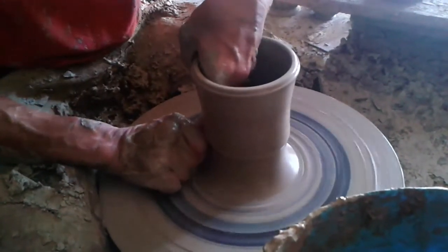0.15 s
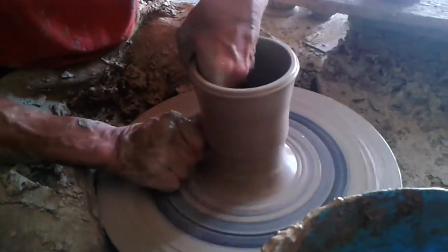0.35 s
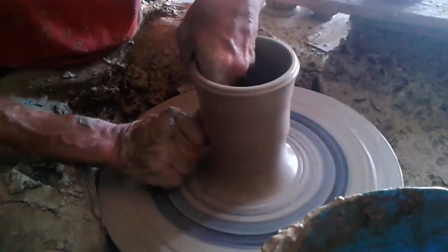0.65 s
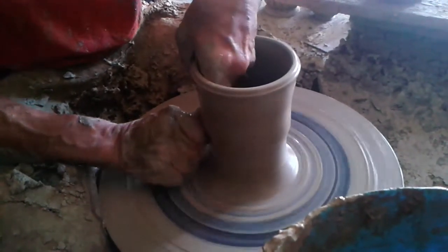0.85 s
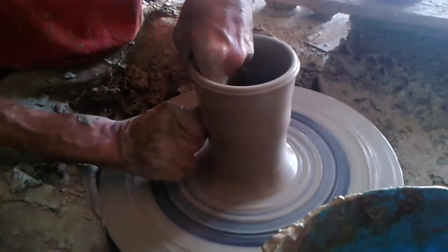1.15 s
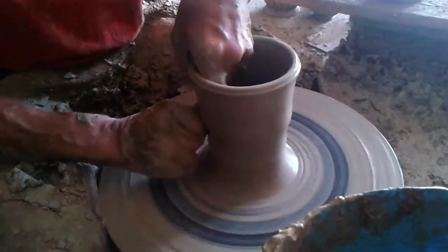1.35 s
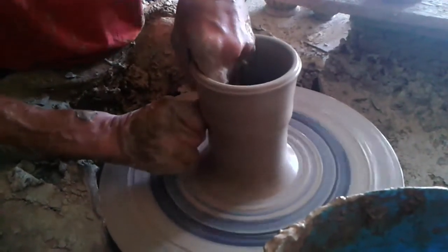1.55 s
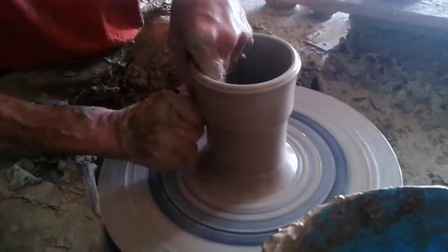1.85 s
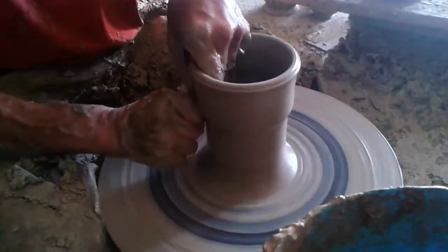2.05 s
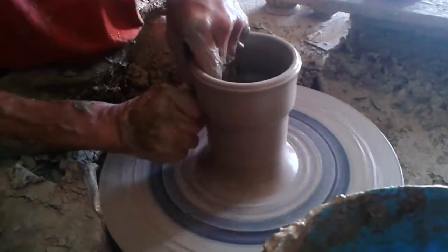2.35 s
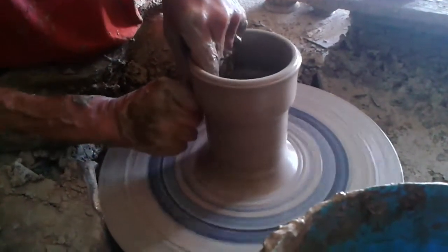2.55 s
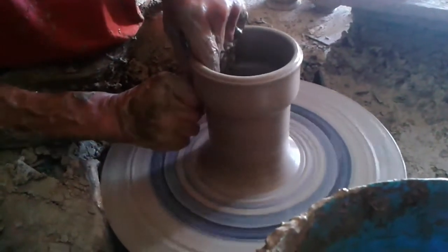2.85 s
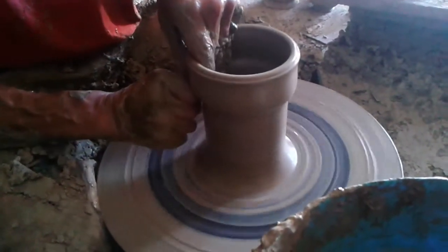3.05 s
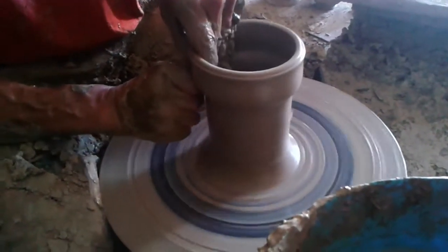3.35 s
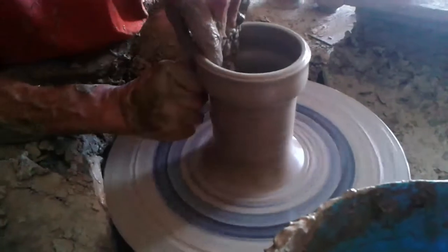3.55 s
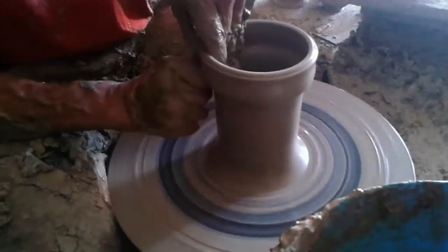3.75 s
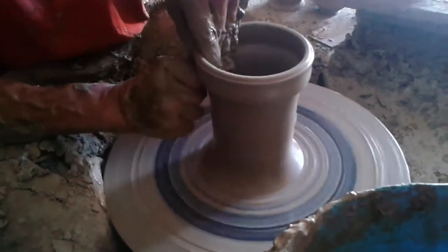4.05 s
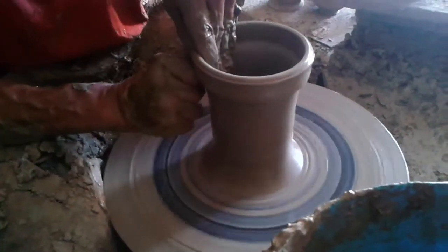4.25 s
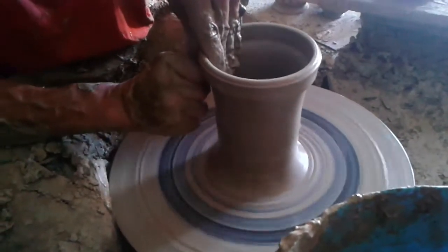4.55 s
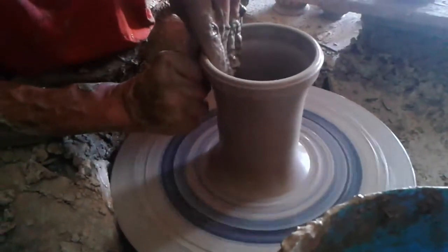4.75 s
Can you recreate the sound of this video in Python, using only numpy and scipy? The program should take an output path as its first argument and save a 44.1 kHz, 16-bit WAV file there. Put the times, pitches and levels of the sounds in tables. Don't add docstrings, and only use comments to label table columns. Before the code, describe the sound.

Close, continuous whirr of an electric pottery wheel: a nasal singing whine, low hum and soft muffled rumbling, with barely any treble.

```python
import sys
import numpy as np
from scipy import signal
from scipy.fft import rfft, irfft, next_fast_len
from scipy.io import wavfile

SR = 44100
rng = np.random.default_rng(int(sys.argv[2]) if len(sys.argv) > 2 else 0)


def inscribe(sig):
    pcm = np.round(np.clip(np.atleast_2d(sig).T, -1, 1) * 32767)
    wavfile.write(sys.argv[1], SR, pcm.astype(np.int16))


def ratio(d):
    e = np.asarray(d, float) / 20
    return 10 ** e


N = 216290
TIME = np.arange(N) / SR


def in_time(rows):
    s, *columns = np.transpose(rows)
    return [np.interp(TIME, s, column) for column in columns]


def drift(rate_hz):
    coarse, settle = 40, 2000
    pole = np.exp(-2 * np.pi * rate_hz * coarse / SR)
    noise = rng.standard_normal(N // coarse + settle + 2)
    slow = signal.lfilter([1], [1, -2 * pole, pole * pole], noise)[settle:]
    return np.interp(np.arange(N) / coarse, np.arange(len(slow)), slow / slow.std())


def tone(turns, level_db, unsteady_db):
    level = np.sqrt(2) * ratio(level_db + unsteady_db * drift(1.5))
    return level * np.sin(2 * np.pi * (turns + rng.random()))


# (t/s, f/Hz)
WHINE_PITCH = [
    (0.2, 637.4),
    (3.47, 635.8),
    (4.7, 637.4),
]
# (t/s, level/dB rms)
WHINE = [
    (0, -36),
    (.4, -33.5),
    (1.7, -32),
    (2.4, -33.5),
    (3.7, -35),
    (4.9, -33.5),
]
# (multiple of shaft speed, level/dB rms, unsteadiness/dB)
SHAFT_ORDERS = [(1, -70.5, -0.9), (4, -58.5, 1.5), (6, -43, -1.5), (11, -39.5, -1.5), (21, -51, 2),
                (22, -45.5, 0), (25, -41, 2), (27, -44.5, 2.0), (28, -53, 2.5), (30, -48, -0.5),
                (45, -63, 7), (46, -52.5, 1.5), (47, -54.5, 1.5), (94.8, -67.5, 3)]
# (f/Hz, level/dB rms, unsteadiness/dB)
MAINS_HUM = [(300.6, -32.5, -1)]


def motor():
    slots, mains_hz = 28, 50
    whine_hz, = in_time(WHINE_PITCH)
    whine_db, = in_time(WHINE)
    shaft_turns = np.cumsum((whine_hz + mains_hz) / slots) / SR
    out = tone(slots * shaft_turns - mains_hz * TIME, whine_db, .8)
    for multiple, level_db, unsteady_db in SHAFT_ORDERS:
        out += tone(round(multiple) * shaft_turns, level_db, unsteady_db)
    for hz, level_db, unsteady_db in MAINS_HUM:
        out += tone(hz * TIME, level_db, unsteady_db)
    return out


# (t/s, level/dB)
SHAKE = [(0, -21), (.5, -21), (1, -21), (1.5, -20.5), (2, -21.5), (2.5, -21.5), (3, -21), (3.6, -19.5),
         (4, -21), (4.5, -20.5), (4.9, -21)]
# (f/Hz, level/dB per Hz)
RUMBLE = [(20, -100), (54, -100), (60, -72), (110, -70), (170, -52), (300, -50), (450, -54.5), (560, -59.5),
          (800, -65.5), (1300, -70), (1650, -78), (2500, -87.5), (3600, -89.5), (4400, -93), (5700, -99)]
# (f/Hz, width/Hz, peak level/dB per Hz)
MODES = [(66, 14, -69.5), (83, 4.9, -66.5), (129.5, 12, -55), (217.3, 32.3, -42), (244.6, 22, -40.5),
         (271, 4.6, -48), (330.5, 21, -48), (346.6, 16, -45), (384.6, 24, -50), (413, 41, -46),
         (453.4, 16, -49), (513, 9, -49.5), (535, 11, -55), (588, 18, -56.5), (601, 8, -53.5),
         (610.5, 8.5, -45.5), (725, 10, -61), (894, 20, -62), (927, 30, -66.5), (950, 42, -60),
         (1150, 39, -68.5), (1230, 43, -74), (1352, 23, -66.5), (1499, 35, -71), (1770, 210, -76.5),
         (1883, 55, -76.5), (2180, 220, -81)]
# (from f/Hz, to f/Hz, share of the shaking's swing, own wavering/dB)
PARTS = [
    (0, 115, .5, 1.5),
    (114, 180, .8, 0.4),
    (179.4, 285, 1.5, 0.4),
    (285.6, 800, .6, 0.1),
    (802, 22050, 0.21, 0.12),
]


def wheel_frame():
    size = next_fast_len(N)
    hz = np.maximum(np.fft.rfftfreq(size, 1 / SR), 1)
    points_hz, points_db = np.transpose(RUMBLE)
    rumble_db = np.interp(np.log(hz), np.log(points_hz), points_db, left=-120, right=-160)
    power = ratio(rumble_db) ** 2
    for mode_hz, width_hz, top_db in MODES:
        resonance = 1 / (1 + (2 * (hz - mode_hz) / width_hz) ** 2)
        power += (ratio(top_db) * resonance) ** 2
    shaken = rfft(rng.standard_normal(size)) * np.sqrt(power * SR / 2)
    shake_db, = in_time(SHAKE)
    swing_db = shake_db - shake_db.mean()
    out = np.zeros(N)
    for low, high, share, own_db in PARTS:
        part = irfft(shaken * ((hz >= low) & (hz < high)), size)[:N]
        out += ratio(share * swing_db + own_db * drift(4.1)) * part
    return out


def drone():
    rise_start_s, rise_length_s = 2, 2.0
    speed = np.clip((TIME - rise_start_s) / rise_length_s, 0, 1)
    hz = 60.8 + 8.5 * speed
    return tone(np.cumsum(hz) / SR, -58 + 6 * speed, 2.5)


def hiss():
    level_db = -97
    white = rng.standard_normal(N) * ratio(level_db) * np.sqrt(SR / 2)
    return signal.sosfilt(signal.butter(8, 5800, "high", fs=SR, output="sos"), white)


GRID, HOP, BAND_BINS = 325, 1024, 32
# (t/s, hiss bands kept, their centre f/kHz)
SPARE = [(.007, 3, 10), (.1, 7, 11.7), (.24, 5, 13.5), (.309, 7, 11.5), (.472, 4, 11), (.82, 8, 11.3),
         (1.47, 5, 11), (1.54, 9, 11), (2.283, 9, 11), (2.353, 8, 11.7), (2.585, 8, 10.7), (2.747, 6, 11.7),
         (2.933, 4, 12.5), (3.235, 8, 11.7), (4.071, 4, 11.3), (4.675, 4, 11.3)]
# (from f/Hz, to f/Hz, share of blocks kept 0-1, leak level/dB when dropped)
WEAK_BANDS = [(2326, 2584, .97, -20), (2584, 2842, .78, -25), (2842, 3100, .74, -27),
              (3100, 3445, .76, -35), (3445, 3790, .62, -42), (3790, 4221, .3, -44)]
# (from f/Hz, to f/Hz, share of the blocks with room to spare 0-1)
RARE_BANDS = [
    (4221, 4651, 1),
    (4651, 5168, .8),
    (5168, 5685, .15),
]
STRAY = [
    [1.702, 1.911, 2.028, 2.608, 3.56, 3.653, 3.676, 3.815, 4.373, 4.489, 4.628, 4.907],
    [.193, 2.26, 2.654, 3.351, 3.421, 3.537, 3.653, 3.746, 3.908, 4.907],
    [],
]


def block_at(s):
    return np.round((np.array(s) * SR - GRID) / HOP).astype(int)


def kept_bands(count):
    hz = (np.arange(HOP) + .5) * SR / 2 / HOP
    residue_db = -41 - 5 * (hz > 10300)
    gain = np.ones((count, 1)) * np.where(hz < WEAK_BANDS[0][0], 1, ratio(residue_db))
    spare = block_at(np.array(SPARE)[:, 0])
    for low, high, share, leak_db in WEAK_BANDS:
        luck = np.convolve(rng.standard_normal(count), [1, .4], "same")
        kept = luck > np.quantile(luck, 1 - share)
        kept[spare] = True
        gain[:, (hz > low) & (hz < high)] = np.where(kept, 1, ratio(leak_db))[:, None]
    for (low, high, share), times in zip(RARE_BANDS, STRAY):
        kept = np.append(spare[rng.random(len(spare)) < share], block_at(times))
        gain[np.ix_(kept, (hz > low) & (hz < high))] = 1
    band_hz = hz.reshape(-1, BAND_BINS).mean(axis=1)
    out_of_range = (band_hz < 6800) | (band_hz > 15900)
    for block, (s, bands, centre_khz) in zip(spare, SPARE):
        off_centre = (band_hz - 1000 * centre_khz) / (2.1 * bands * band_hz[0])
        cost = rng.random(len(band_hz)) + off_centre ** 4 + 99 * out_of_range
        chosen = cost <= np.sort(cost)[bands - 1]
        gain[block, np.repeat(chosen, BAND_BINS)] = 1
    return gain


def starved(x):
    n = np.arange(2 * HOP) + .5
    window = np.sin(np.pi * n / 2 / HOP)[:, None]
    basis = np.cos(np.pi / HOP * np.outer(n + HOP / 2, n[:HOP])) * window * np.sqrt(2 / HOP)
    lead, count = 2 * HOP - GRID, N // HOP + 2
    padded = np.pad(x, (lead, 2 * HOP), mode="reflect")
    blocks = padded[:(count + 1) * HOP].reshape(-1, HOP)
    gain = kept_bands(count)
    gain = np.vstack([gain[:1], gain[:-1]])
    spectra = np.hstack([blocks[:-1], blocks[1:]]) @ basis
    back = (spectra * gain) @ basis.T
    overlapped = back[1:, :HOP] + back[:-1, HOP:]
    return overlapped.ravel()[lead - HOP:][:N][None]


def scene():
    low_cut = signal.butter(2, 56, "high", fs=SR, output="sos")
    radiated = signal.sosfilt(low_cut, wheel_frame())
    return (motor() + radiated + drone())[None]


def roll_off(x):
    return signal.sosfilt(signal.butter(12, 15860, fs=SR, output="sos"), x)


def record(dry):
    from_end_s = np.minimum(TIME, TIME[::-1])
    ends = np.sin(np.pi / 2 * np.clip(from_end_s / .003, 0, 1)) ** 2
    mix = ends * starved(dry[0] + hiss())
    return roll_off(mix)


dry = scene()
out = record(dry)
inscribe(out)
```